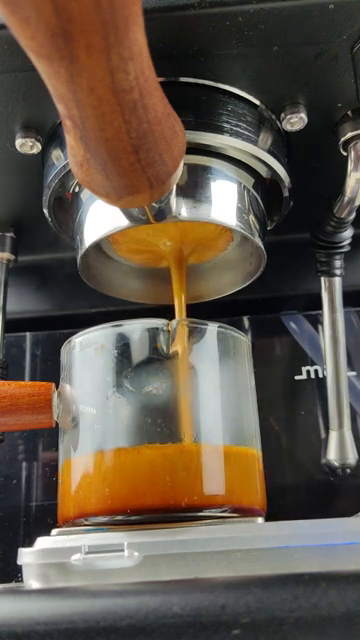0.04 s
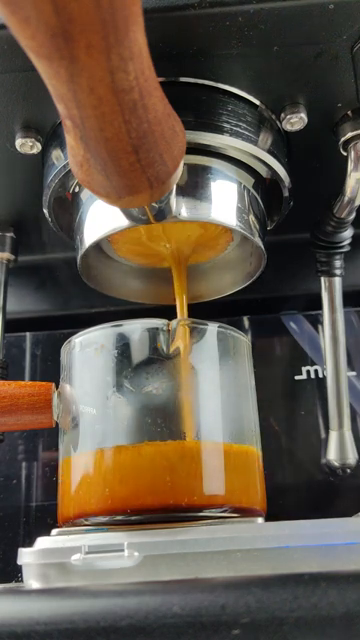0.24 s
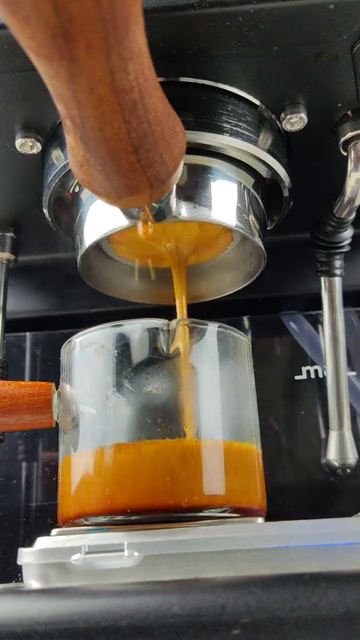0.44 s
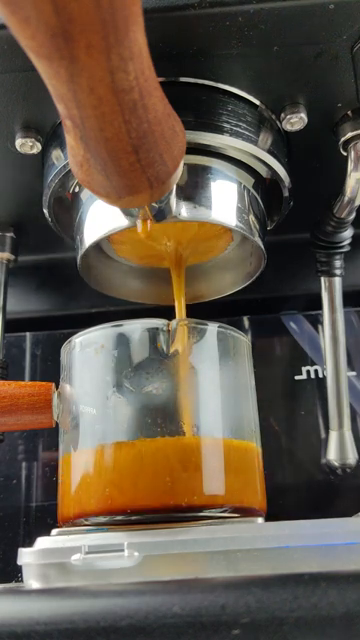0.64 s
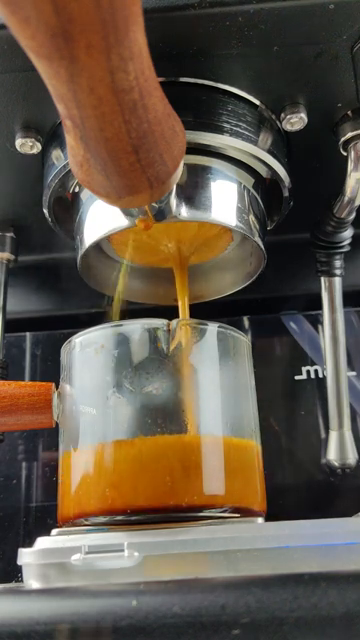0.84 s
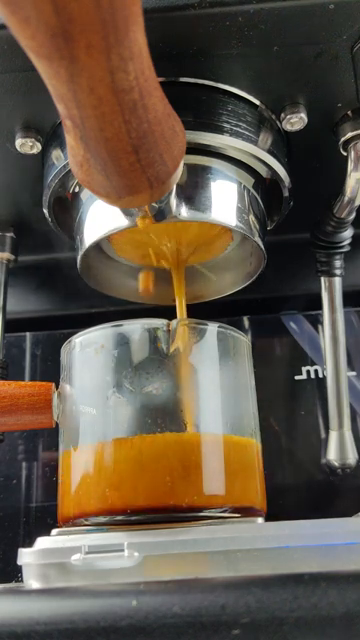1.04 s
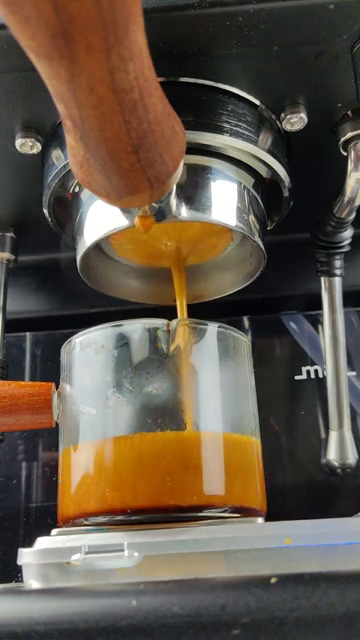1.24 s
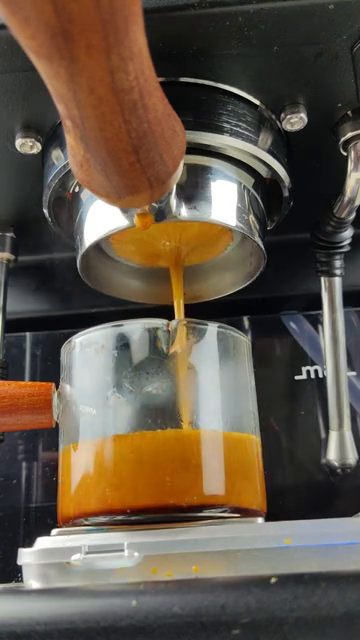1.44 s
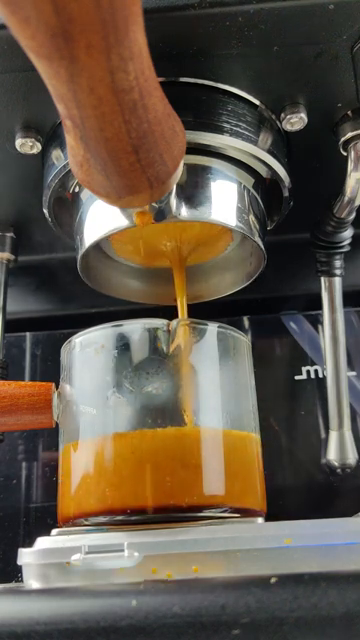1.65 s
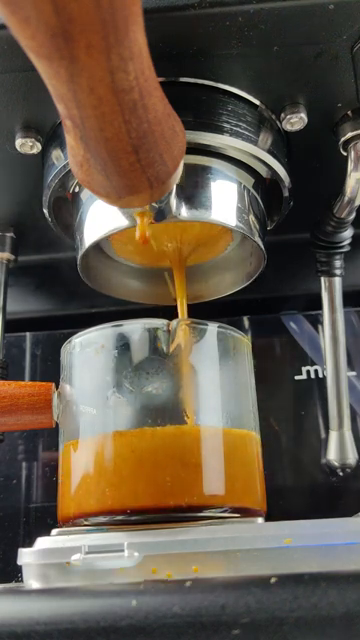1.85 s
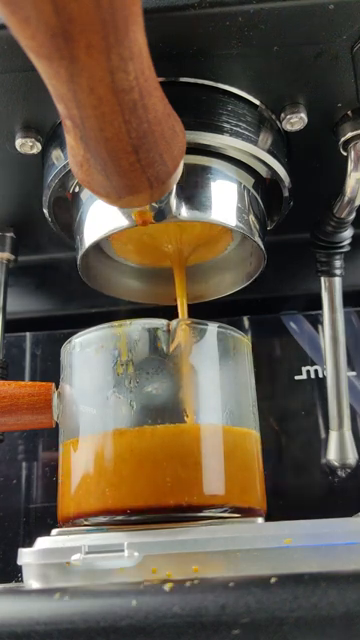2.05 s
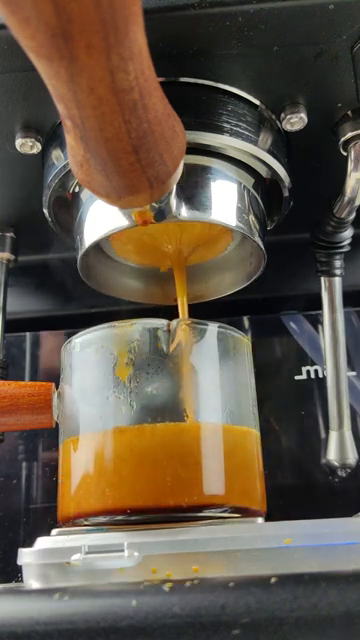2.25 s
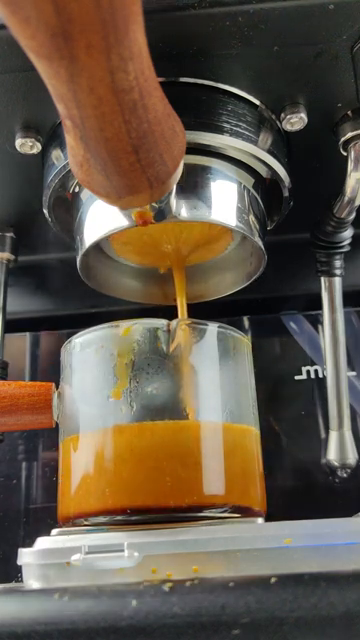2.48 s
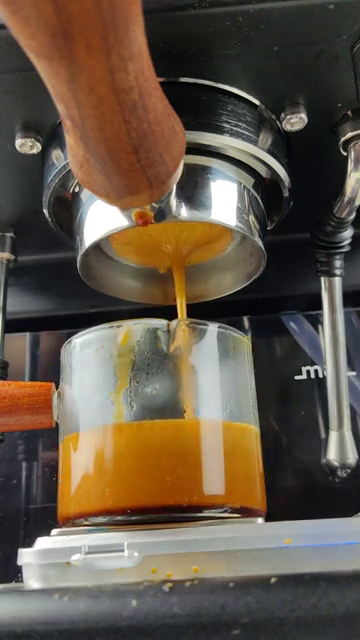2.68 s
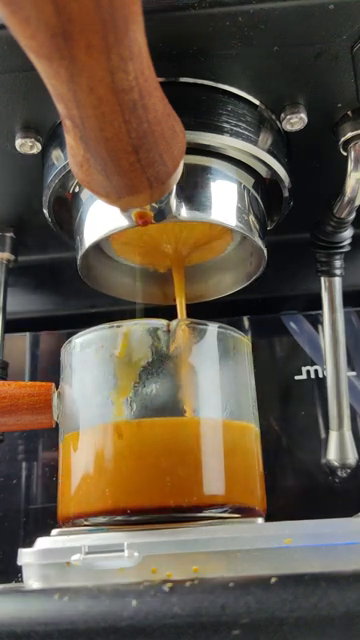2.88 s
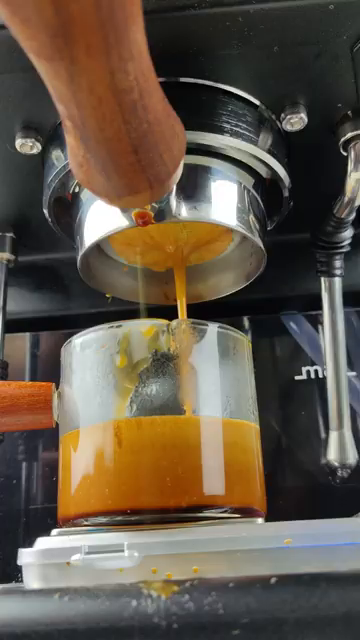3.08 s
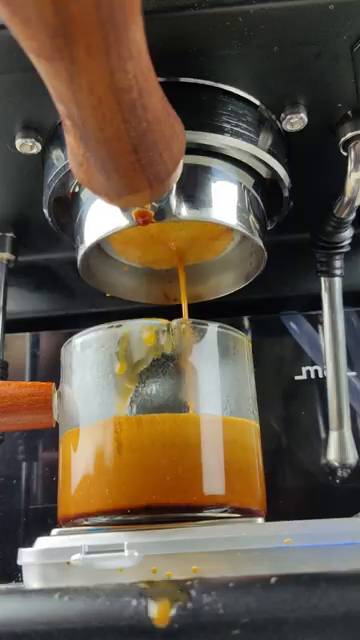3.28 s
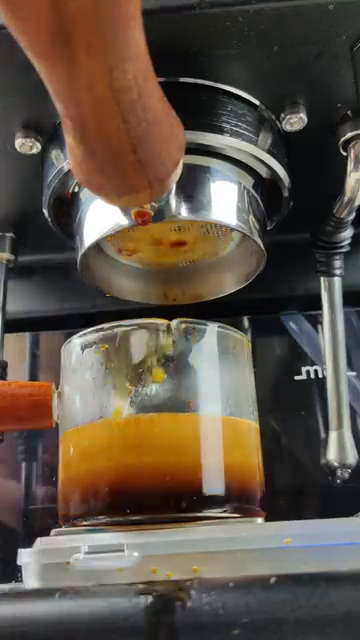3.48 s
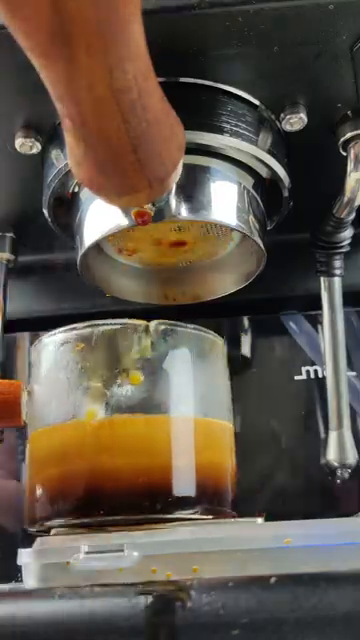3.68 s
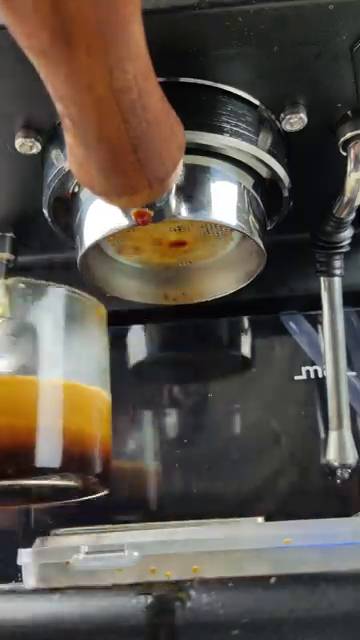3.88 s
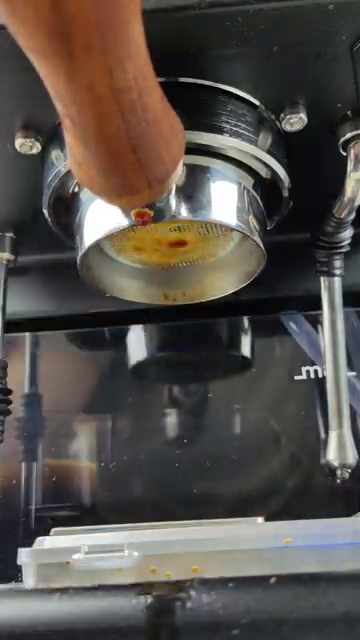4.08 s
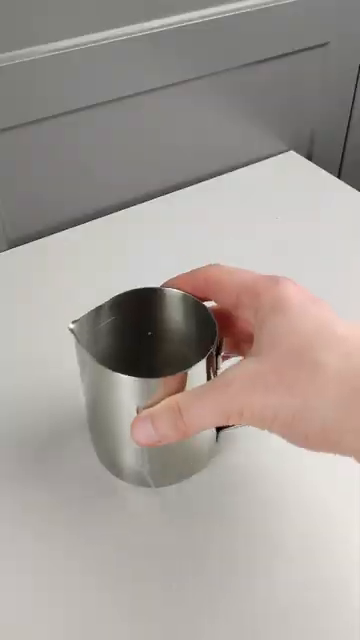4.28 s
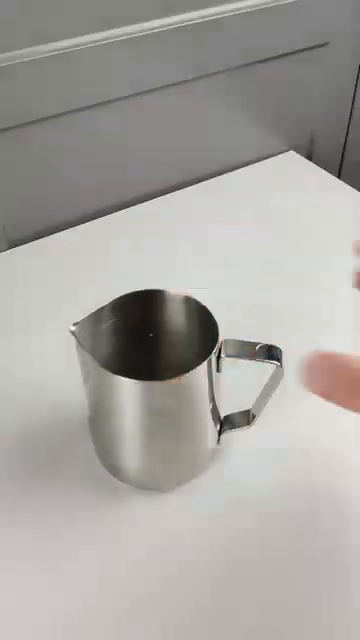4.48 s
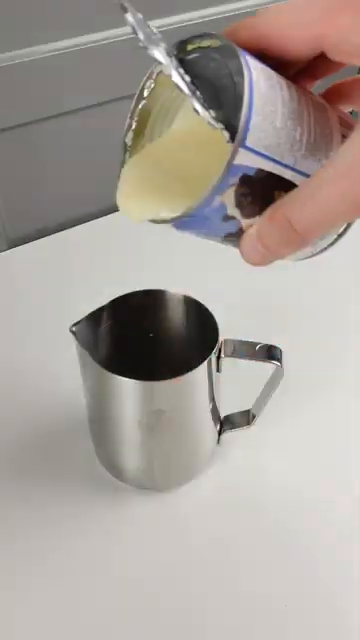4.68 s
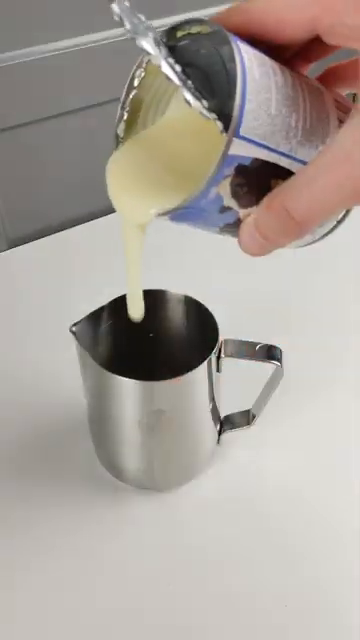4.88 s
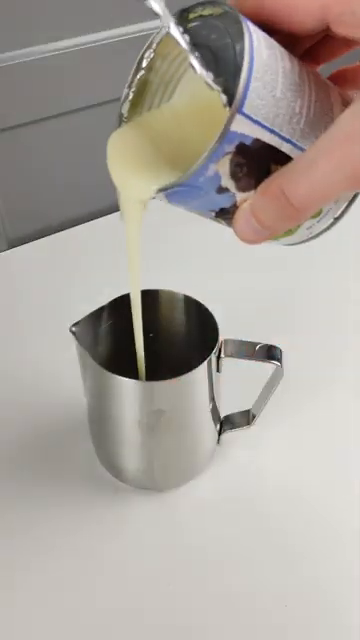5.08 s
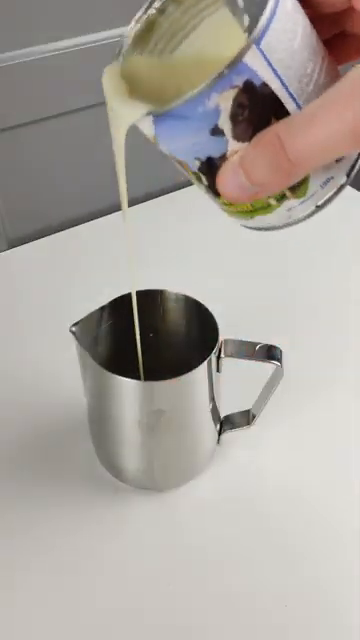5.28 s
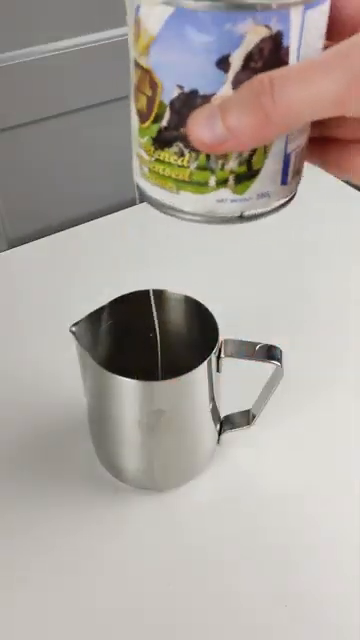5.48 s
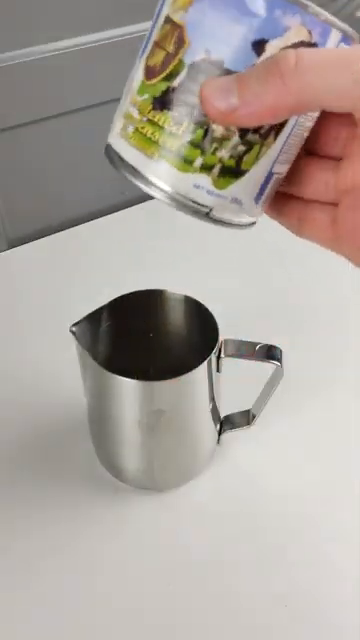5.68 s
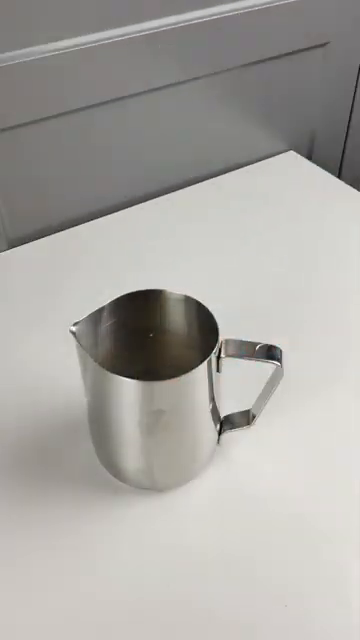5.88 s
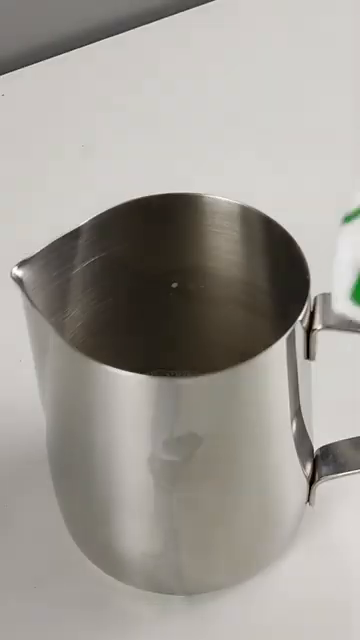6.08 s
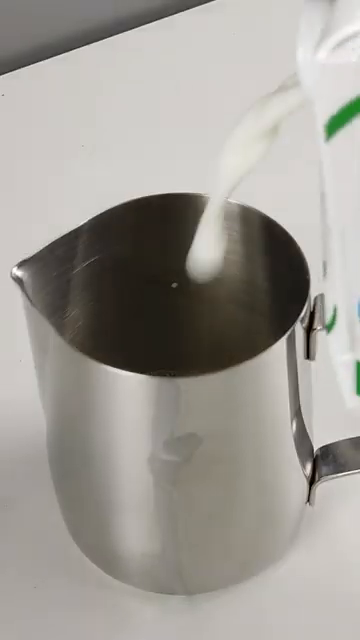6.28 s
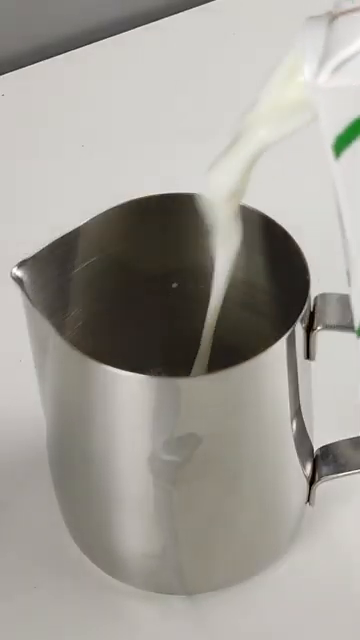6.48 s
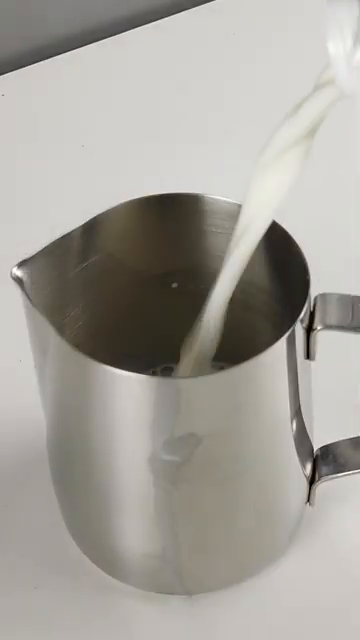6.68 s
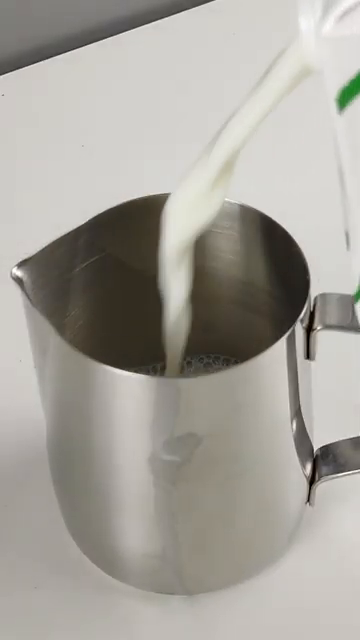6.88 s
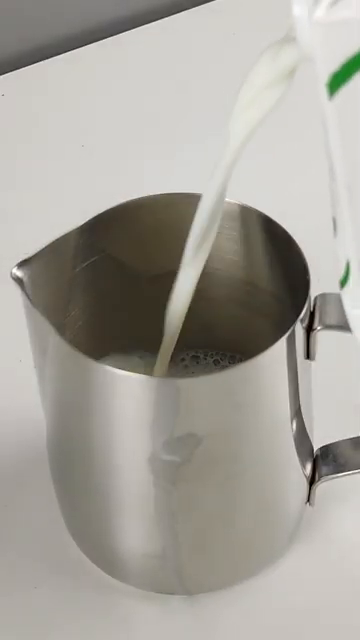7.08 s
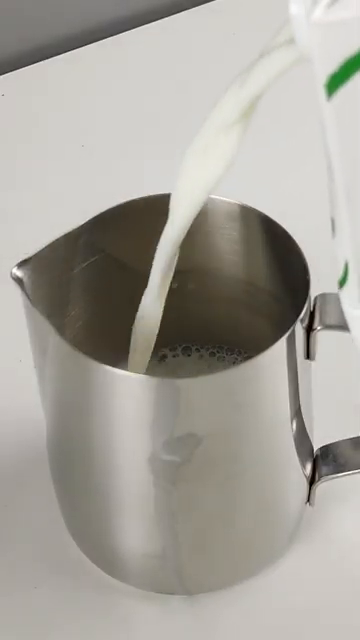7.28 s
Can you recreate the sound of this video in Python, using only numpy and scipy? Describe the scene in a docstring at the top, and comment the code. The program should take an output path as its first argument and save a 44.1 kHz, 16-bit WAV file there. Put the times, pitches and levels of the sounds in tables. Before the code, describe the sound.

A coffee machine's electric pump buzzes steadily for about three seconds, low hum easing slightly, and cuts out with a loud click. In the near silence a glass slides softly, a metal pitcher clunks on the counter, and small taps sound. Finally a short pour of milk crackles on steel and gurgles. Close stereo phone microphone, little reverberation.

```python
"""The vibration pump of an espresso machine, close to a phone's microphones in a small, quiet kitchen: pulsed tones
and bursts make it hum and buzz until its switch snaps off. The glass is slid away (swells of grainy hiss), a steel jug
lands on the counter (bursts and decaying modes) and a tin is knocked softly (short resonant taps). Milk poured into
the jug spatters on bare steel (clouds of tiny pops), then gurgles as a pool forms (ringing bubbles).
Faint steady room tone lies behind it all."""
import sys
import numpy as np
from scipy import signal
from scipy.fft import rfft, irfft
from scipy.io import wavfile

SR = 44100
rng = np.random.default_rng(int(sys.argv[2]) if len(sys.argv) > 2 else 0)


def dump_mix(stems):
    """Bounce the given channels to the path in sys.argv[1] as a 16-bit WAV at rate SR."""
    frames = np.atleast_2d(stems).T  # one column per channel
    limited = np.clip(frames, -1, 1)  # hard clip at full scale
    pcm = np.round(limited * 32767).astype(np.int16)
    wavfile.write(sys.argv[1], SR, pcm)


N = 323694
T = np.arange(N) / SR  # s

PUMP_OFF_S = 3.166
POUR_START_S = 6.41
TOP_HZ = 15900  # upper limit of the microphones and of the pitch of the pops

# thin buzz of the pump, also the colour of its last sigh: [f/Hz, relative level/dB]
BUZZ_SPECTRUM = [(2300, -10.5), (2800, -19.5), (3600, -3), (4200, -21.5), (4800, 1), (5400, -17.5),
                 (6500, -10.5), (9000, -12), (11000, -5.5), (13000, -3), (14000, -2.5), (15500, -2)]
# milk splashing on the steel: [t/s, energy level before the room/dB, mean delay of the pops/s]
MILK_SPLASHES = [(6.423, -32.5, 0.0095), (6.462, -30.5, 0.0062), (6.497, -25.5, 0.0055),
                 (6.539, -20.5, 0.0044), (6.599, -24, .005), (6.618, -20, .004), (6.645, -11, .007),
                 (6.71, -28.5, .004), (6.741, -18, 0.0069), (6.789, -11.5, .005), (6.823, -21.5, .005),
                 (6.835, -15.5, .0015), (6.916, -21.5, .0015), (6.933, -12.5, 0.009),
                 (7.047, -17.5, 0.0057), (7.184, -27.5, 0.0019)]


def pump():
    """The piston strikes twice a mains cycle: a drone, casing tones, a low rattle and a thin buzz on every stroke."""
    # tones of the casing: [multiple of the stroke rate, level before the common gain/dB]
    casing_tones = [(2, -79), (3, -89.5), (4, -78.5), (5, -61.5), (7, -76), (9, -80.5), (10, -76),
                    (11, -88), (12, -74.5), (13, -69), (14, -67), (15, -67.5), (16, -69.5), (17, -72.5),
                    (18, -78), (20, -76.5), (21, -74)]
    # low rattle: [f/Hz, relative level/dB]
    rattle_spectrum = [(60, -31.5), (200, -21), (350, -9.5), (520, 4.5), (900, -5), (1400, 6.5), (2000, 2),
                       (2600, -3), (4000, -63)]
    # coarse rasp under load: [f/Hz, relative level/dB]
    rasp_spectrum = [(1500, -27), (2500, -7.5), (3500, -8.5), (4200, -9.5), (6500, -0.5), (9000, -4),
                     (15000, -6.5)]
    mains_hz, casing_gain_db = 49.957, -.8
    loaded_db, free_db, ease_s, ease_width_s = -56, -65.5, 0.78, 0.18

    # the drone eases from its loaded level to a free-running one as the coffee starts to flow
    load = (1 - np.tanh((T - ease_s) / (2 * ease_width_s))) / 2
    drone_db = free_db + (loaded_db - free_db) * load
    stroke_hz = 2 * mains_hz
    opposite = np.array([[1], [-1]])
    angle = 2 * np.pi * stroke_hz * T
    drone = np.sqrt(2) * undb(drone_db) * np.cos(angle) * pan(10.5) * opposite

    # the panels swing against each other, so the two microphone ports hear them out of step
    tones = 0
    scatters = rng.standard_normal(len(casing_tones))
    for (multiple, db), scatter in zip(casing_tones, scatters):
        phase = round(multiple) * (angle - .3) + .75 * scatter
        tones = tones + undb(db) * (np.cos(phase) + np.cos(phase - 2.2) * opposite)

    pulsing = np.exp(0.523 * np.cos(angle - .2))
    rattle = unit(colour(noise() * pulsing, rattle_spectrum))

    # loose metal chatters in nearly the same way on each stroke: one burst, uneven only in strength and timing
    count = int(PUMP_OFF_S * stroke_hz)
    timing, strength = rng.standard_normal((count, 2)).T
    starts = (np.arange(count) + .6) / stroke_hz * SR + .2 * timing  # samples
    strokes = np.zeros(N)
    strokes[np.round(starts).astype(int)] = undb(1.3 * strength)
    chatter = convolve(strokes, crack(0.082)) * np.sqrt(SR / stroke_hz)

    # only the highest part is new on every stroke
    high_pass = signal.butter(1, 8000, "high", fs=SR)
    sizzle = signal.lfilter(*high_pass, noise() * np.exp(.6 * np.cos(angle - 5.1)))
    buzz = colour(undb(-63) * chatter + undb(-59.0) * unit(sizzle), BUZZ_SPECTRUM)
    # under heavy load the chatter turns into a coarser rasp
    rasp = undb(drone_db - 9.5) * colour(chatter, rasp_spectrum)
    buzz = (buzz + rasp) * pan(-12.5)

    running = np.clip((PUMP_OFF_S - T) / 0.006, 0, 1)
    casing = np.sqrt(2) * undb(casing_gain_db) * tones
    return running * (drone + casing + undb(-68) * rattle * pan(0) + buzz)


def switch():
    """The switch snaps off and rings the panel, then the remaining pressure sighs out of the group head."""
    # snap of the switch: [f/Hz, relative level/dB]
    snap_spectrum = [(200, -30.5), (500, -11.5), (1000, -8.5), (1450, -3), (2100, -17), (3000, -7.5),
                     (5200, -0.5), (7000, -4), (8500, -9), (10500, -1), (12000, -14), (15000, -10.5)]
    # modes of the machine's front panel: [f/Hz, relative level/dB, t60/s]
    panel_modes = [(980, -5, .17), (1464, 1, .15), (1663, -5, .16), (2783, -6, .19), (4237, -4, .14),
                   (5012, -5, .14), (5523, -4, .13), (7020, -5, .13)]
    out = np.zeros((2, N))
    snap = undb(-6.5) * crack(.006) + undb(-0.5) * convolve(crack(0.0037), room(5.3))
    panel = undb(-14.5) * ring(panel_modes, lag_s=.0003)
    add(out, 3.1634, colour(snap, snap_spectrum) + panel)
    # the sigh dies away at 33 dB/s
    sigh = (T > PUMP_OFF_S) * undb(-68.5 - 33 * np.abs(T - PUMP_OFF_S))
    return out + sigh * colour(noise(), BUZZ_SPECTRUM) * pan(-12)


def jug():
    """The steel jug lands and rocks; jug and worktop ring briefly into the room."""
    # dull knock of the landing: [f/Hz, relative level/dB]
    knock_spectrum = [(50, -51), (110, -27), (170, -15.5), (260, -11), (750, -3.5), (1450, -0.5),
                      (2400, -4.5), (3900, -22), (5000, -15.5), (7500, -25.5), (9100, -35.5), (10300, -29),
                      (11600, -52.5), (12800, -26.5), (15000, -38)]
    # modes of the jug on the counter: [f/Hz, relative level/dB, t60/s]
    jug_modes = [(265, 2.5, .21), (358, -3.5, 0.13), (389, -4.5, 0.16), (514, -0.5, 0.23),
                 (647, 2.5, 0.068), (745, 2.5, 0.14), (772, -0.5, 0.23), (896, 0, 0.2), (1024, -3, 0.2),
                 (1296, 0.5, 0.13), (1433, 1.5, 0.16), (1834, -6.5, 0.19), (2144, -4.5, .14),
                 (2256, -0.5, 0.12), (2674, -7, 0.19)]
    # blows of the jug's base: [t/s, gain/dB]
    base_blows = [(4.362, 11.5), (4.3701, -8.5), (4.4159, -11)]
    out = np.zeros((2, N))
    # at 45 dB the room response is nearly all reverberation
    bursts = undb(-5) * crack(0.0062) + undb(-2.0) * crack(0.068) + undb(-8.0) * room(45)
    knock = colour(bursts, knock_spectrum)
    body = undb(-8.0) * ring(jug_modes, lag_s=.0001)
    for s, db in base_blows:
        add(out, s, undb(db) * (knock + body))
    # so small a body radiates no deep bass
    return signal.sosfilt(signal.butter(3, 95, "high", fs=SR, output="sos"), out) * pan(0.67)


def milk():
    """Droplets spatter on the steel; once a pool forms, bubbles ring the air in the jug."""
    # spatter on the steel: [f/Hz, relative level/dB]
    splash_spectrum = [(1000, 2.5), (1700, 7), (2600, 0), (4000, -4.5), (5600, 2), (6800, -3.5),
                       (9500, 0.5), (12000, -0.5), (15000, -1)]
    # jug's base under the stream: [f/Hz, relative level/dB]
    base_spectrum = [(120, -24), (250, -4.5), (400, -17), (750, 0.5), (1300, -17), (2600, -2.5),
                     (5000, -20)]
    # big trapped air bubbles: [t/s, level before the room/dB, starting f/Hz]
    big_bubbles = [(6.515, -46, 1540), (6.791, -45, 1630), (6.9406, -27, 1620), (7.026, -35.5, 1480),
                   (7.049, -29.5, 1755), (7.1118, -40, 1470), (7.149, -49, 1720), (7.166, -41, 1720),
                   (7.187, -43, 1790)]
    fizz_db, gurgle_db, bare_gurgle_db = -61.5, -65, -23  # the last is added while the steel is bare
    # every splash leaves a dying fizz, every big bubble a dying wake of small ones (dB re the event)
    spray_db, spray_rise_s, spray_t60_s = -38, 0.0091, 0.11
    wake_db, wake_rise_s, wake_t60_s = -12.5, 0.015, 0.12

    splash_fizz = undb(spray_db) * aftermath(MILK_SPLASHES, spray_rise_s, spray_t60_s)
    flow = np.hypot(undb(fizz_db) * stream(), splash_fizz)
    spray = colour(spatter(flow), splash_spectrum) * pan(-1.8)

    churn = undb(gurgle_db + bare_gurgle_db * (1 - covered(T))) * stream()
    wake = undb(wake_db) * aftermath(big_bubbles, wake_rise_s, wake_t60_s)
    gurgle = np.hypot(churn, wake)
    small_bubbles = resonate(resonate(droplets(700, 4.4), 1620, 300), 1650, 620)
    pool = gurgle * unit(small_bubbles) * np.ones((2, 1))
    for s, db, hz in big_bubbles:
        add(pool, s, undb(db) * bubble(hz, t60=0.01, glide=1.1))

    # the stream also drums on the base of the jug
    drum = gurgle * unit(colour(droplets(700, 2.0), base_spectrum))
    in_jug = convolve(pool + undb(-5) * drum, room(-5.0)) * pan(2.4)
    return convolve(spray, room(-2.5)) + in_jug


def stream():
    """Strength of the stream of milk: it swells, holds at 1 and thins out."""
    full_s, ease_s, swell_db_per_s, thin_db_per_s = 6.64, 7.11, 65, 54
    swell_db = swell_db_per_s * np.minimum(T - full_s, 0)
    thin_db = thin_db_per_s * np.minimum(ease_s - T, 0)
    return (T > POUR_START_S) * undb(swell_db + thin_db)


def covered(s):
    """How far the pool covers the base of the jug at time s, 0-1."""
    pool_full_s = 6.9
    return np.clip((s - POUR_START_S) / (pool_full_s - POUR_START_S), 0, 1)


def spatter(flow):
    """A steady fizz that follows flow, and a dense cloud of pops for each splash."""
    bare_hz, pool_hz = 11900, 5966  # splashes grow duller as the pool covers the steel
    start, end = POUR_START_S, N / SR
    fizz = pops(rng.uniform(start, end, 3000), bright_hz=8000, spread_db=4, cycles=3)
    # rms 1 over the pour rather than over the whole scene
    out = flow * unit(fizz) * np.sqrt(1 - start / end)
    for s, db, length in MILK_SPLASHES:
        bright_hz = bare_hz * (pool_hz / bare_hz) ** covered(s)
        times = length * rng.exponential(size=90)
        cloud = pops(times, bright_hz, spread_db=4.5, cycles=27, size=SR // 10)
        add(out, s, undb(db) * unit_energy(cloud))
    return out


def pops(times, bright_hz, spread_db, cycles, size=N, count=128):
    """Tiny bursting bubbles of uneven size around bright_hz, decaying over some cycles, at most count samples."""
    hz = bright_hz * np.exp(.5 * rng.standard_normal((len(times), 1)))
    # pitches above the limit are folded back below it
    hz = np.where(hz > TOP_HZ, TOP_HZ ** 2 / hz, hz)
    gain = undb(spread_db * np.minimum(rng.exponential(size=hz.shape), 3))
    t = T[:count]
    shape = gain * np.sqrt(hz) * np.exp(-t * hz / cycles) * np.minimum(t * hz, 1)
    where = (times[:, None] * SR).astype(int) + np.arange(count)
    # each port hears its own phase
    phase = rng.random((2, len(times), 1))
    waves = shape * np.sin(2 * np.pi * (hz * t + phase))
    return np.array([np.bincount(where.ravel(), w.ravel(), size)[:size] for w in waves])


def bubble(hz, t60, glide):
    """A pocket of air swells into ringing and rises in pitch as it nears the surface."""
    t = T[:SR // 20]
    shape = (1 - np.exp(-t / 0.0013)) ** 2 * fade(t60, SR // 20)
    return shape / shape.max() * np.sin(2 * np.pi * hz * t * (1 + glide * t))


def droplets(per_s, spread_db):
    """Random tiny impacts of very uneven size, rms 1."""
    hit = rng.random(N) < per_s / SR
    sign = rng.choice([-1, 1], N)
    size_db = spread_db * np.minimum(rng.exponential(size=N), 4)
    return unit(hit * sign * undb(size_db))


def aftermath(events, rise_s, t60):
    """Envelope that rises after each (t/s, level/dB, ..) event and dies away; events add in power."""
    power = np.zeros((1, N))
    shape = np.minimum(T[:SR // 2] / rise_s, 1) * fade(t60)
    for s, db, _ in events:
        add(power, s, (undb(db) * shape) ** 2)
    return np.sqrt(power[0])


def handling():
    """Small taps (resonant pulses), short swells of soft, bright hiss (random grains) and dull bumps (low noise)."""
    # small taps and ticks: [t/s, energy level before the room/dB, f/Hz, width/Hz]
    small_taps = [(5.031, -44.5, 4190, 1500), (5.032, -52, 1400, 500), (6.003, -39, 1550, 300),
                  (6.0135, -24, 1320, 463), (6.019, -31.5, 1304, 352), (6.02, -43, 330, 60),
                  (6.394, -46.5, 1390, 695), (6.397, -37, 252, 129)]
    # soft, bright hiss: [f/Hz, relative level/dB]
    hiss_spectrum = [(500, -9.5), (1500, -17.5), (3200, -1), (6000, -6.5), (9000, -5), (11500, -0.5),
                     (15000, -4)]
    # short swells of the hiss: [centre t/s, level before the room/dB, spread/s]
    hiss_swells = [(3.625, -60.5, 0.018), (3.695, -72, 0.027), (4.502, -65.5, 0.033), (5.8, -70, 0.023)]
    # dull bumps: [centre t/s, level/dB, spread/s, f/Hz]
    dull_bumps = [(3.705, -69.5, 0.024, 534), (4.182, -58.5, 0.025, 37.6)]
    out = np.zeros((2, N))
    t = T[:SR // 10]
    for s, db, hz, width_hz in small_taps:
        # a soft contact swells before it rings out
        age = np.pi * width_hz * t
        tap = age ** 2 * np.exp(-age) * np.sin(2 * np.pi * hz * t)
        add(out, s, undb(db) * unit_energy(tap)[None])
    grains = np.array([droplets(4000, 3), droplets(4000, 3)])
    hiss = unit(colour(grains, hiss_spectrum))
    for s, db, length in hiss_swells:
        out += undb(db) * np.exp(-.5 * ((T - s) / length) ** 2) * hiss
    out = convolve(out, room(-5.5)) * pan(-5.0)
    for s, db, length, hz in dull_bumps:
        thud = unit(resonate(resonate(noise(), hz, hz), hz, hz))
        out += undb(db) * np.exp(-.5 * ((T - s) / length) ** 2) * thud
    return out


def room_tone():
    """Faint steady rumble and hiss: coloured noise."""
    # quiet kitchen: [f/Hz, relative level/dB]
    tone_spectrum = [(25, 2.5), (60, -9.5), (130, -14), (250, -19), (500, -21), (1000, -28.5), (3000, -34),
                     (8000, -36.5), (15000, -36.5)]
    return undb(-68) * unit(colour(noise(), tone_spectrum))


def room(wet_db, size=SR // 2):
    """Direct sound and the diffuse answer of walls and counter, unit energy."""
    # kitchen reverberation: [f/Hz, t60/s]
    kitchen_decay = [(200, 0.29), (1000, 0.17), (4000, 0.17), (15000, 0.08)]
    hz, t60 = np.transpose(kitchen_decay)
    f = np.log(np.maximum(np.fft.rfftfreq(size, 1 / SR), 1))
    spectrum = rfft(diffuse(size))
    tail = 0
    # overlapping bands, each with its own decay
    for share, band_t60 in zip(np.eye(len(hz)), t60):
        band = irfft(spectrum * np.interp(f, np.log(hz), share), size)
        tail = tail + band * fade(band_t60)
    onset = np.minimum(T[:size] / 0.0038, 1)
    response = undb(wet_db) * unit_energy(tail * onset)
    response[:, 0] += 1
    return unit_energy(response)


def diffuse(size):
    """Sound from all sides: the two ports agree in the bass and differ in the treble."""
    mid, side = noise(size)
    side = signal.lfilter(*signal.butter(2, 900, "high", fs=SR), side)
    return np.array([mid + side, mid - side])


def crack(t60):
    """A short burst of dense ringing, unit energy."""
    return unit_energy(diffuse(SR // 2) * fade(t60))


def ring(modes, lag_s):
    """Decaying modes, each reaching the two ports with its own small lag; unit energy."""
    t = T[:SR // 2]
    lags = lag_s * rng.uniform(-1, 1, (len(modes), 2, 1))
    total = 0
    for (hz, db, t60), lag in zip(modes, lags):
        envelope = undb(db) * fade(t60) * np.minimum(t * hz / 2, 1)
        total = total + envelope * np.sin(2 * np.pi * hz * (t + lag))
    return unit_energy(total)


def resonate(x, hz, width_hz):
    """One resonance, gain 1 at its centre."""
    hz = min(hz, SR / 2 - 1000)
    return signal.lfilter(*signal.iirpeak(hz, hz / min(width_hz, SR / 4), fs=SR), x)


def colour(x, points, size=2048):
    """Causal minimum-phase filter of unit energy with a spectrum of (f/Hz, level/dB) points."""
    hz, db = np.transpose(points)
    f = np.maximum(np.fft.rfftfreq(size, 1 / SR), 1)
    cepstrum = irfft(np.log(undb(np.interp(np.log(f), np.log(hz), db))))
    # folding the cepstrum onto positive time makes the filter causal
    cepstrum[1:size // 2] *= 2
    cepstrum[size // 2 + 1:] = 0
    return convolve(x, unit_energy(irfft(np.exp(rfft(cepstrum)))))


def convolve(x, response):
    """Pass x through a response, keeping the length of x."""
    return signal.fftconvolve(np.atleast_2d(x), np.atleast_2d(response), axes=-1)[:, :x.shape[-1]]


def noise(size=N):
    """Independent white noise at the two ports."""
    return rng.standard_normal((2, size))


def fade(t60, size=SR // 2):
    """Exponential decay by 60 dB in t60 seconds."""
    return np.exp(-np.log(1000) * T[:size] / t60)


def undb(db):
    """Amplitude of a level in dB."""
    return 10 ** (np.asarray(db) / 20)


def unit(x):
    """Scale to rms 1."""
    return x / np.sqrt(np.mean(x ** 2))


def unit_energy(x):
    """Scale to a mean energy of 1 per channel."""
    return x / np.sqrt(np.mean(np.sum(x ** 2, axis=-1)))


def pan(left_db):
    """Left and right gains for a left-minus-right level."""
    return unit(undb(np.array([[left_db], [-left_db]]) / 2))


def add(out, s, x):
    """Mix x into out from time s."""
    i = int(s * SR)
    out[:, i:i + x.shape[-1]] += x[..., :N - i]


def scene():
    """Everything heard in the kitchen, from the pump to the room tone."""
    return pump() + switch() + jug() + milk() + handling() + room_tone()


def record(dry):
    """The phone lifts the top treble by 10 dB in one narrow step and cuts off steeply above it."""
    f = np.fft.rfftfreq(2 * N, 1 / SR)
    lift = undb(10.0 * np.clip((f - 12050) / 250, 0, 1))
    low_pass = 1 / np.sqrt(1 + (f / TOP_HZ) ** 240)
    return irfft(rfft(dry, 2 * N) * lift * low_pass)[:, :N]


dry = scene()
out = record(dry)
dump_mix(out)
```